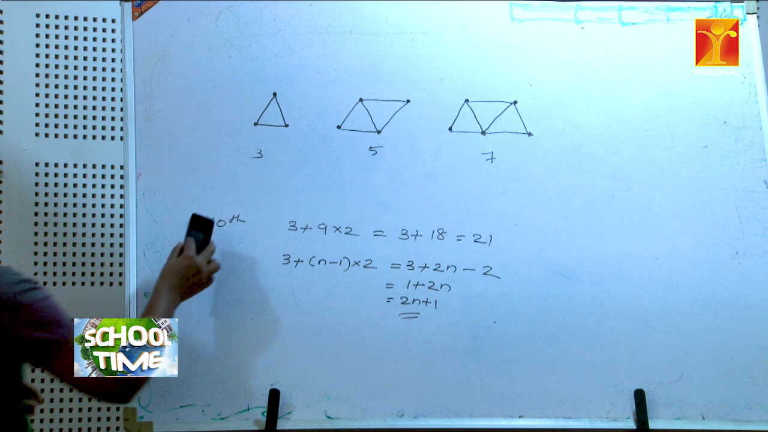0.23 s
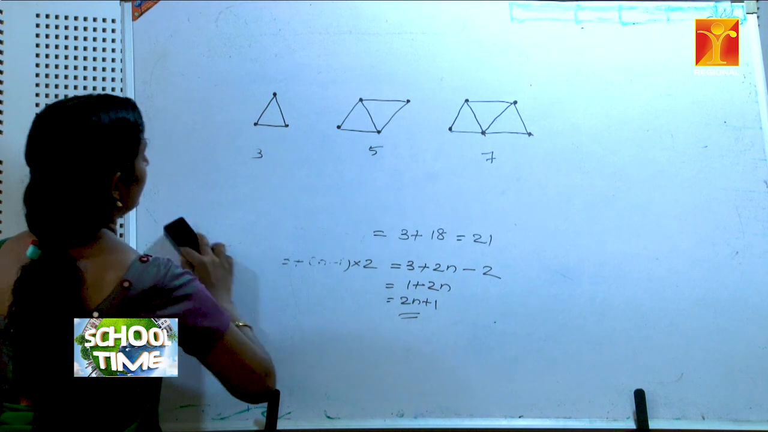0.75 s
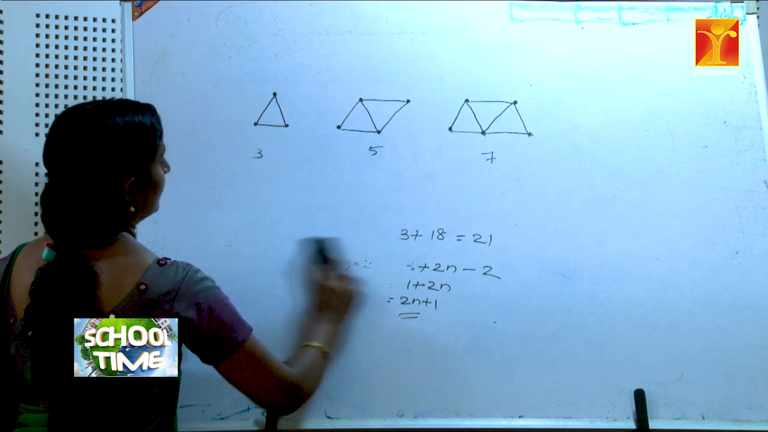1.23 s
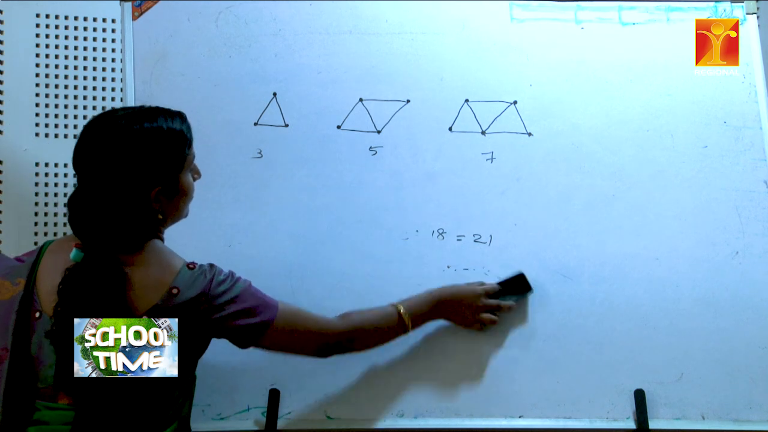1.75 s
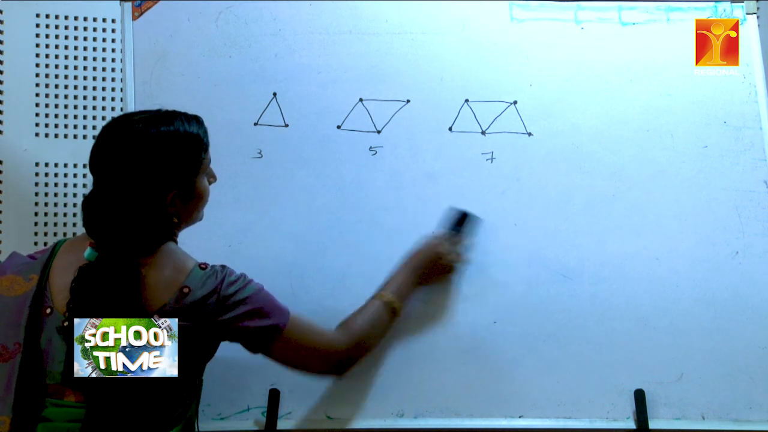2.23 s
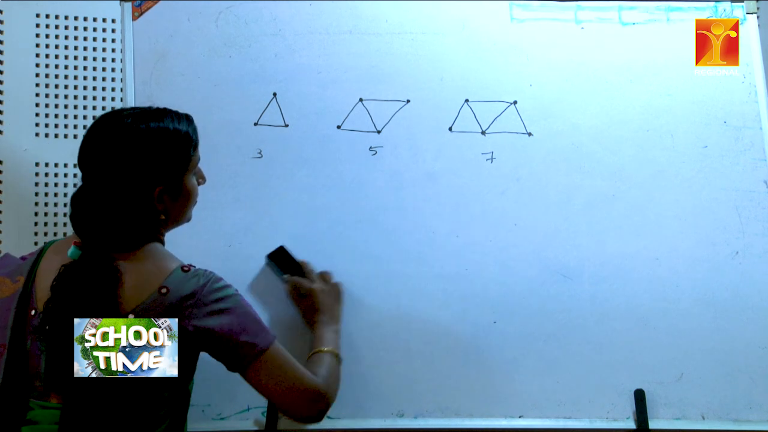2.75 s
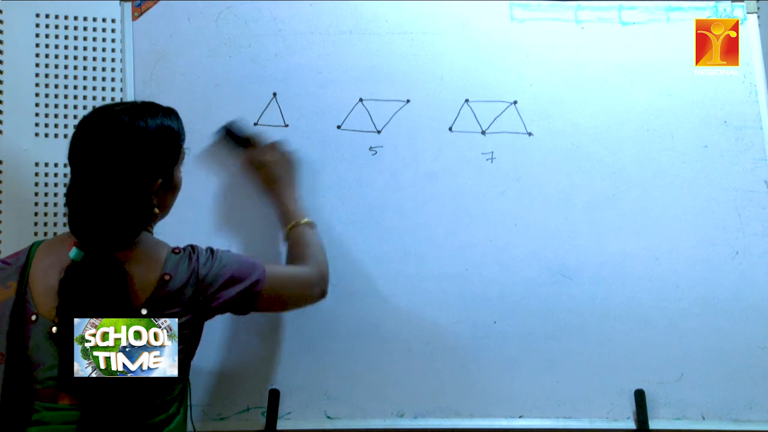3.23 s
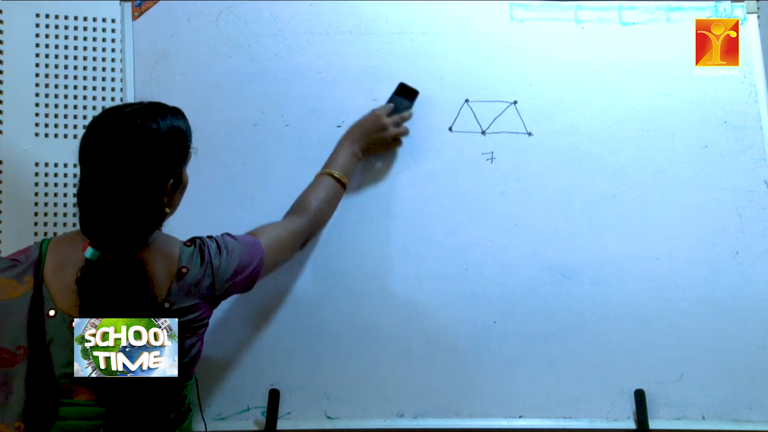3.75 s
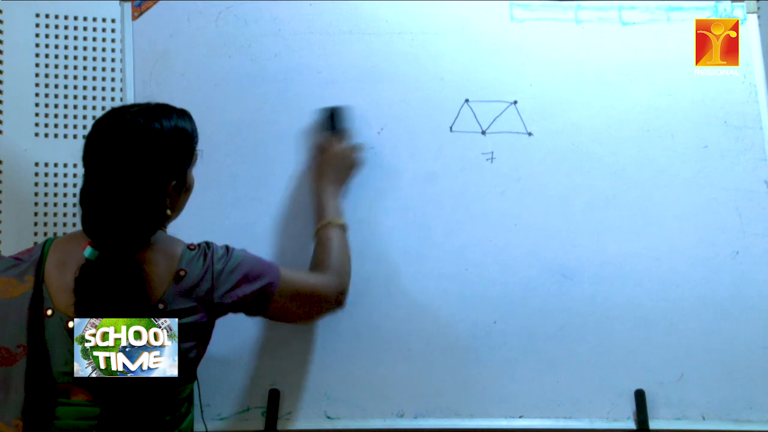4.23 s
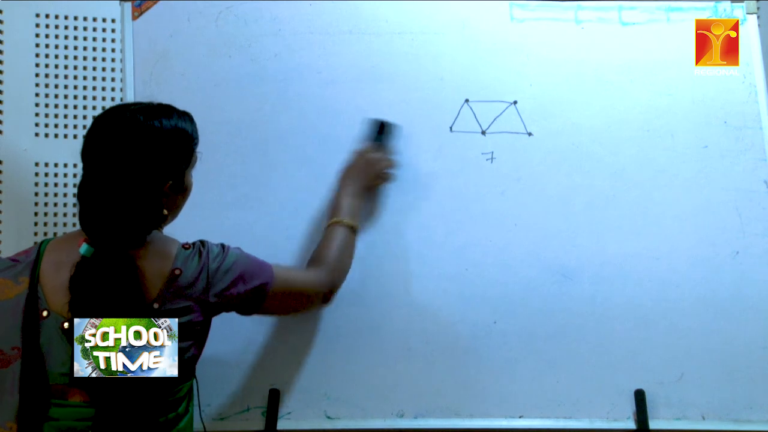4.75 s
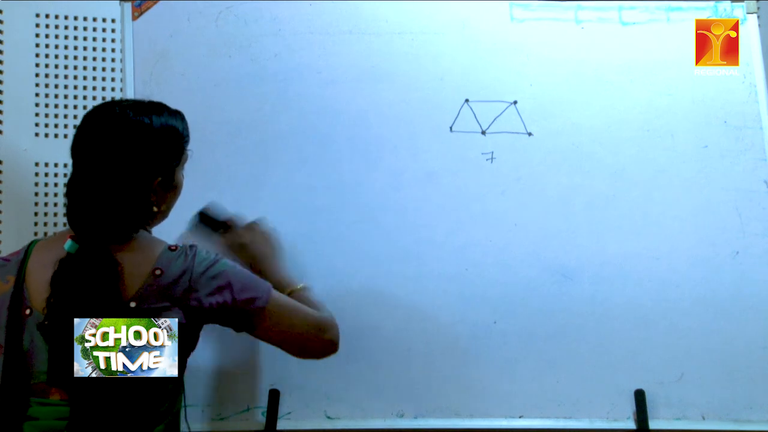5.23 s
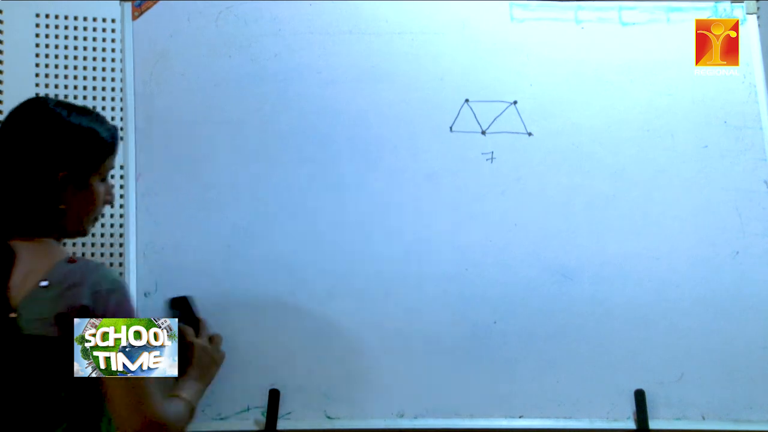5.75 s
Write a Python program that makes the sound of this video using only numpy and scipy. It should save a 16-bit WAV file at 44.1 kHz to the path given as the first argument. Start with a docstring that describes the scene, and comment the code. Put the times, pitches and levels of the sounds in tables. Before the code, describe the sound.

Faint, uneven whiteboard wiping under dull cloth rustle and small bumps on a clip-on microphone, with constant hiss.

```python
"""A teacher wipes a whiteboard for six seconds, heard through a clip-on microphone over steady hiss and
faint room air. Light, uneven strokes come first: the felt swishes faintly, while each arm swing drags
cloth and cable over the capsule in a dull rumble, with scuffs and knocks. From about 3 s the strokes
are firmer and the knocks more frequent. The hardest knock falls just after 5 s, with a click of the
clip, and the wiping then weakens. All but the recorder's hiss is mono."""
import sys
import numpy as np
from scipy import signal
from scipy.fft import rfft, irfft, next_fast_len
from scipy.io import wavfile
from scipy.ndimage import map_coordinates

SR = 44100
rng = np.random.default_rng(int(sys.argv[2]) if len(sys.argv) > 2 else 0)


def persist_wave(psi):
    """Save psi, clipped to +-1, as 16-bit WAV."""
    counts = np.round(np.clip(psi, -1, 1) * 32767).astype(np.int16)
    wavfile.write(sys.argv[1], SR, np.atleast_2d(counts).T)


N = 264159

# Spectrum of the amplifier hiss: frequency_hz, relative_db
HISS_SPECTRUM = [(15, -23), (40, -18), (190, -1), (700, 0.5), (2500, 0.5), (5400, 1.5), (9300, 1),
                 (10500, 2.5), (12750, 1.5), (12950, -16.5), (15700, -14.5)]
# Spectrum of the classroom air: frequency_hz, relative_db
AIR_SPECTRUM = [(100, -37), (600, 4), (2000, -1.5), (5000, -12), (12000, -44)]
# Spectrum of felt sliding on the board: frequency_hz, relative_db
FELT_SPECTRUM = [(800, -31), (2000, -7), (4300, -8.5), (5250, -4.5), (6000, -11), (8000, -13.5),
                 (12000, -15.5), (13500, -77)]
# Clicks of the clip spring on four hard knocks: start_s, level_db
CLIP_CLICKS = [(.2221, -53), (2.345, -37.5), (3.2574, -29.5), (5.1241, -34.5)]
# Modes of clip and capsule, one thump then four that ring: pitch_hz, t60_s, first_swing_sign
MOUNT_MODES = [(111.5, 0.015, -1), (341, 0.015, 1), (509, 0.01, 1), (714, 0.012, 1), (1056, 0.0065, 1)]
# Knocks on the capsule: start_s, push_sign (pull is -1), thump_db, ring_db,
CAPSULE_KNOCKS = [(0.2186, -1, -55, -24, 1.8, 0.5), (0.2222, -1, -22, -13.5, 1.17, .45),
                  (.486, 1, -25, -30, 1, 0.16), (0.4932, -1, -27, -22, 0.24, 0.65),
                  (0.7084, -1, -42, -23, 1.23, 0), (0.7104, -1, -50, -24.5, 0.47, .25),
                  (0.7986, -1, -50, -28.5, 1.1, 0.2), (1.1213, -1, -37, -33.5, 1.7, 0.5),
                  (1.6225, -1, -23, -32.5, 1.9, 0.37), (1.6789, -1, -43, -23.5, 1.5, 0.34),
                  (1.6965, -1, -23, -16.5, 0.51, 0.13), (1.7267, -1, -41, -23, 0.43, .48),
                  (2.0285, -1, -60, -34, 0.62, 0.6), (2.3457, -1, -20, -17, 0.75, 0.42),
                  (2.38, -1, -17, -22.5, 1.1, 0.17), (2.6485, 1, -63, -36, 0.24, 0.4),
                  (2.8855, -1, -40, -26, 0.62, .48), (2.896, -1, -18, -19, 0.82, 0.22),
                  (3.2405, -1, -48, -29, 1.1, .48), (3.256, -1, -38, -14, 0.69, .48),
                  (3.258, -1, -20, -6.5, 0.86, 0.42), (3.2642, -1, -51, -8.5, 0.46, 0.5),
                  (3.3507, -1, -30, -13.5, 0.58, .48), (3.438, -1, -42, -25.5, 1.14, 0.36),
                  (3.4791, -1, -58, -23, 0.31, .48), (3.5569, -1, -28, -18, -0.38, 0.53),
                  (3.626, 1, -39, -22, 0.27, .47), (3.846, -1, -52, -20, 0.62, 0.3),
                  (3.865, -1, -38, -17, -0.11, .31), (3.9159, -1, -32, -19.5, -0.43, 0.5),
                  (4.2422, -1, -26, -19, -0.11, 0.33), (4.3585, 1, -52, -36.5, .5, .3),
                  (4.425, 1, -44, -27, -0.25, 0.5), (4.4439, -1, -35, -20.5, 0.79, 0.3),
                  (4.4468, 1, -41, -20, 1.1, 0.26), (4.6719, -1, -22, -22.5, 0.25, .48),
                  (4.7777, -1, -14.5, -19, 0.9, 0.31), (4.7971, -1, -26, -29, 1.2, .48),
                  (5.0525, 1, -18, -21.5, 0.74, 0.25), (5.0785, 1, -45, -20.5, 0.92, 0.34),
                  (5.122, -1, -15, -18, 0.24, 0.68), (5.124, 1, -6.5, 1.5, 0.91, 0.33),
                  (5.3509, -1, -20.5, -26, 1.48, 0.46), (5.5278, -1, -31, -25.5, 0.75, 0.31),
                  (5.5668, -1, -22, -24.5, 0.52, 0.43), (5.5877, -1, -38, -26, 1.2, 0.36),
                  (5.654, -1, -30, -28.5, 0.6, .48)]
# Spectrum of cloth dragging the mount: frequency_hz, relative_db
RUMBLE_SPECTRUM = [(15, -59), (30, -30), (55, 1), (90, 1), (170, -2.5), (300, -8.5), (600, -43),
                   (2000, -100)]
# Spectrum of cloth rubbing the grille: frequency_hz, relative_db
SCUFF_SPECTRUM = [(80, -15), (200, -2), (320, -1.5), (520, -4), (800, -8), (1300, -16), (1800, -22.5),
                  (2600, -47), (9000, -97)]
# Arm strokes: peak_s, rise_s, fall_s, scuff_db, rumble_db
ARM_STROKES = [(.15, 0.21, .05, -55, -50.5), (0.226, 0.079, 0.033, -47.5, -53),
               (.4, 0.14, .1, -50.5, -53.5), (.5, 0.069, 0.16, -48.5, -48.5), (.7, .07, 0.18, -49.5, -51.5),
               (.8, 0.076, 0.046, -48.5, -56), (.905, 0.13, 0.12, -52, -46),
               (1.107, 0.28, 0.12, -54, -51.5), (1.25, 0.14, 0.16, -53, -54.5),
               (1.693, 0.13, 0.11, -42.5, -44), (1.96, 0.24, 0.062, -55.5, -53),
               (2.1, 0.11, 0.044, -44.5, -45.5), (2.177, .06, 0.027, -57, -52),
               (2.29, 0.16, 0.18, -52.5, -54), (2.4, 0.28, 0.15, -54.5, -52.5),
               (2.655, 0.058, 0.1, -50.5, -51), (2.908, 0.17, .15, -42.5, -42),
               (3.265, 0.13, 0.16, -40, -42), (3.45, 0.1, 0.13, -46.5, -50.5),
               (3.561, 0.021, 0.012, -39, -43), (3.654, 0.099, 0.082, -39, -39),
               (3.858, 0.13, .11, -39.5, -45), (4.058, .09, 0.042, -40, -41), (4.225, 0.28, 0.11, -45, -46),
               (4.305, 0.091, 0.033, -47, -45), (4.433, 0.1, 0.05, -42, -42),
               (4.57, .04, 0.072, -46.5, -54), (4.66, 0.11, 0.045, -47, -42.5),
               (4.74, 0.05, .05, -47.5, -49), (4.785, 0.083, 0.034, -41, -38),
               (4.856, 0.044, 0.019, -48.5, -48), (4.93, 0.054, 0.11, -47.5, -53.5),
               (5.056, 0.17, 0.066, -40.5, -46), (5.135, 0.058, 0.023, -43.5, -49),
               (5.24, 0.041, 0.041, -63, -64), (5.356, 0.069, 0.043, -52.5, -52),
               (5.529, 0.12, 0.18, -49, -52), (5.6, 0.12, .3, -55, -54), (5.79, 0.23, 0.035, -56.5, -55.5),
               (5.98, 0.4, .1, -57.5, -63)]


def amp(db):
    """Amplitude ratio of a level in decibels."""
    return 10 ** (np.asarray(db) / 20)


def unit_rms(x):
    """Normalisation to unit mean power."""
    return x / np.sqrt(np.mean(x ** 2) + 1e-20)


def wobble(rate_hz):
    """Slow random modulation: a spline through rate_hz random values a second."""
    knots = rng.standard_normal(int(N * rate_hz / SR) + 4)
    return map_coordinates(knots, [np.arange(N) * rate_hz / SR])


def coloured(x, spectrum):
    """Minimum-phase filtering: shapes the spectrum and conserves the power of white noise."""
    hz, db = np.transpose(spectrum)
    bins_hz = np.fft.rfftfreq(8192, 1 / SR)
    gain = amp(np.interp(np.log(bins_hz + 1), np.log(hz + 1), db))
    cepstrum = irfft(np.log(gain))
    cepstrum[1:4096] *= 2  # folding onto positive time makes the filter causal
    cepstrum[4097:] = 0
    kernel = irfft(np.exp(rfft(cepstrum)))
    kernel /= np.linalg.norm(kernel)
    return signal.fftconvolve(np.atleast_2d(x), kernel[None], axes=1)[:, :N]


def stick_slip(rate_hz, spread_db, smooth_db):
    """Stick-slip friction: fibres let go in random jerks on top of a smooth drag."""
    when, way = rng.random((2, N))
    jerks = (when < rate_hz / SR) * np.sign(way - .5) * amp(spread_db * rng.standard_normal(N))
    return unit_rms(unit_rms(jerks) + amp(smooth_db) * rng.standard_normal(N))


def amplifier_hiss():
    """Electronic noise: each input amplifier has its own, so the two channels are uncorrelated."""
    return amp(-58.5) * coloured(rng.standard_normal((2, N)), HISS_SPECTRUM)


def room_air():
    """Ambient noise: stationary, broadband and strongest near 600 Hz."""
    return amp(-66.5) * coloured(rng.standard_normal(N), AIR_SPECTRUM)


def felt_swish(scuff_db):
    """Sliding friction: dense slips of felt on the board merge into a swish that grows with effort."""
    firm_swish_db, firm_scuff_db = -63, -49.5  # levels in a firm stroke
    swish_db = firm_swish_db + 0.53 * (scuff_db - firm_scuff_db) + 2.02 * wobble(60)
    return coloured(amp(swish_db) * stick_slip(3000, spread_db=2.5, smooth_db=9.5), FELT_SPECTRUM)


def clip_clicks(pitch_hz=3600, t60_s=0.0025):
    """Damped free vibration: the clip spring dies away so fast that it is heard as a click."""
    out, t = np.zeros(N), np.arange(SR // 200) / SR
    for start_s, level_db in CLIP_CLICKS:
        click = amp(level_db - 60 * t / t60_s) * np.sin(2 * np.pi * pitch_hz * t)
        out[round(start_s * SR):][:len(t)] += click
    return out


def capsule_knocks():
    """Modal response to impact: each blow rings the damped modes of the mount; long contact dulls it."""
    octave_loss_db, scatter_db = 15, 2  # loss one octave off the centre; random spread of mode levels
    node_leak = 0.18  # amplitude left in a mode struck at a node
    out, t = np.zeros(N + SR), np.arange(SR // 10) / SR
    hz, t60_s, swing_sign = np.transpose(MOUNT_MODES)[:, :, None]
    octaves = np.log2(hz / hz[1])
    swell = 1 - np.exp(-(t * hz / 0.22) ** 2)  # each mode builds up over part of a cycle
    pulse_ms = np.arange(-40, 41) * 1000 / SR
    for start_s, push_sign, thump_db, ring_db, centre_octaves, place in CAPSULE_KNOCKS:
        detune, scatter = rng.standard_normal((2, len(hz), 1))
        mode_db = ring_db - octave_loss_db * (octaves - centre_octaves) ** 2 + scatter_db * scatter
        shape = np.sin(np.pi * place * np.arange(len(hz)))[:, None]  # one more node for each mode
        mode_db += 10 * np.log10(shape ** 2 + node_leak ** 2)
        mode_db[0] = thump_db
        envelope = swell * amp(mode_db - 60 * t / t60_s)
        modes = np.sign(push_sign * swing_sign) * np.sin(2 * np.pi * hz * (1 + 0.052 * detune) * t)
        ring = (envelope * modes).sum(axis=0)
        contact_ms = max(0.085 - 0.006 * (ring_db + 22.5), .04)  # harder blows are briefer
        force = np.exp(-.5 * (pulse_ms / contact_ms) ** 2)
        out[round(start_s * SR):][:len(t)] += np.convolve(ring, force / force.sum())[:len(t)]
    return out[len(pulse_ms) // 2:][:N]


def stroke_levels():
    """Incoherent addition: overlapping strokes sum in power, giving scuff and rumble levels in dB."""
    fade_db = 28  # loss one rise time before a peak and one fall time after it
    rise_exponent, fall_exponent = 1.21, 1.84  # the fall holds, then breaks off
    t = np.arange(0, N / SR + .004, .002)
    power = amp([[-66.5], [-64.5]]) ** 2  # the cloth never lies quite still
    for peak_s, rise_s, fall_s, *peak_db in ARM_STROKES:
        from_peak = np.abs(t - peak_s) / np.abs(np.where(t < peak_s, rise_s, fall_s))
        loss_db = fade_db * from_peak ** np.where(t < peak_s, rise_exponent, fall_exponent)
        power = power + amp(np.array(peak_db)[:, None] - loss_db) ** 2
    return [np.interp(np.arange(N) / SR, t, 10 * np.log10(layer)) for layer in power]


def cloth_rumble(level_db):
    """Structure-borne sound: dragging cloth shakes the mount at low frequencies."""
    return coloured(amp(level_db) * stick_slip(150, spread_db=0, smooth_db=-0.5), RUMBLE_SPECTRUM)


def cloth_scuff(level_db):
    """Friction noise at the grille, modulated in amplitude as the threads pass."""
    weave_db = 1.5 * wobble(90)
    friction = amp(level_db + weave_db) * stick_slip(500, spread_db=7.5, smooth_db=3)
    return coloured(friction, SCUFF_SPECTRUM)


def scene():
    """Superposition: all sources add at one microphone, which feeds both channels."""
    air = room_air()
    scuff_db, rumble_db = stroke_levels()
    grip_db = 1.6 * wobble(40)  # the cloth grips unevenly, which both its sounds share
    cloth = cloth_rumble(rumble_db + grip_db) + cloth_scuff(scuff_db + grip_db)
    mono = air + felt_swish(scuff_db) + clip_clicks() + capsule_knocks() + cloth
    return np.repeat(mono, 2, axis=0)


def record(dry):
    """Band limiting: the recorder adds its hiss and passes nothing above the cutoff."""
    cutoff_hz, size = 15720, next_fast_len(N)
    passband = np.fft.rfftfreq(size, 1 / SR) < cutoff_hz
    return irfft(rfft(dry + amplifier_hiss(), size) * passband, size)[:, :N]


dry = scene()
out = record(dry)
persist_wave(out)
```